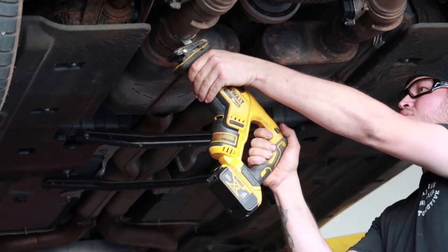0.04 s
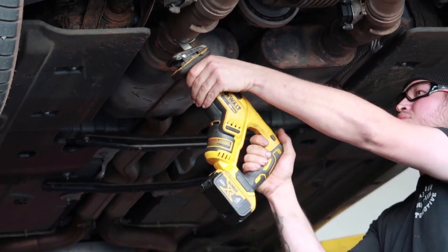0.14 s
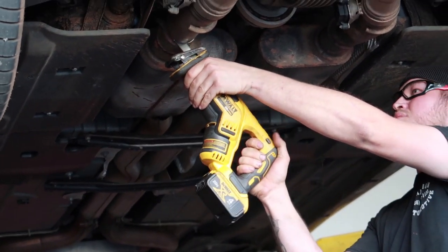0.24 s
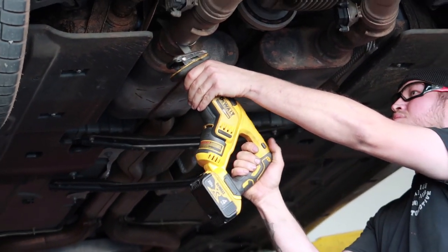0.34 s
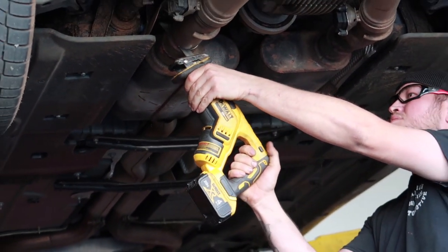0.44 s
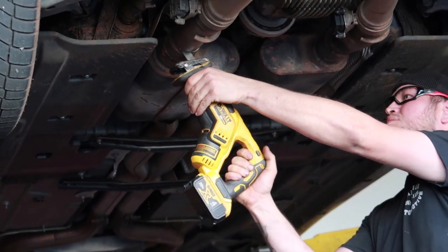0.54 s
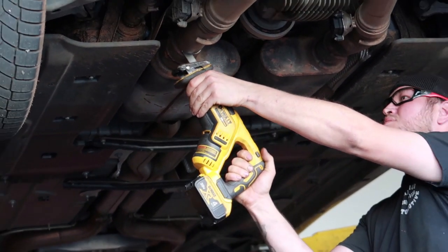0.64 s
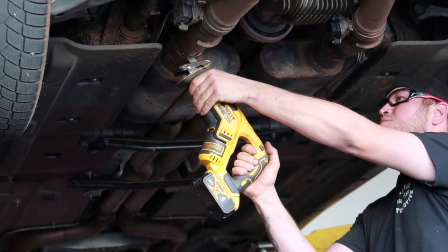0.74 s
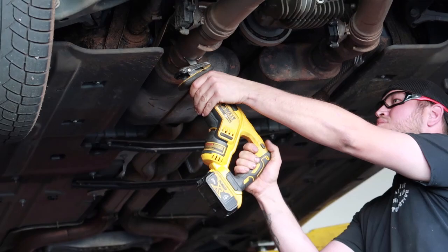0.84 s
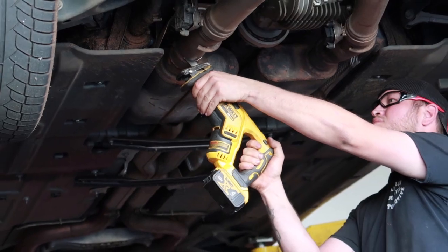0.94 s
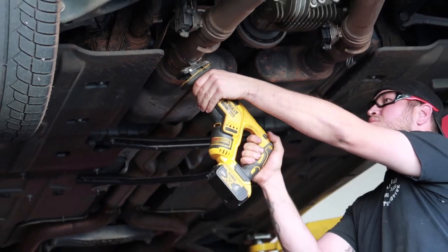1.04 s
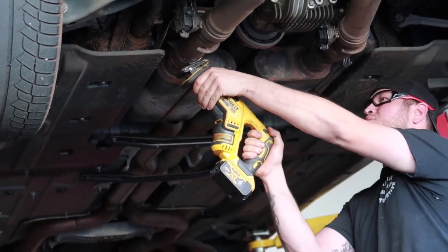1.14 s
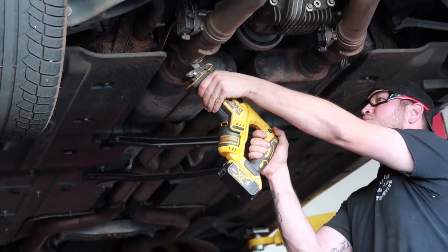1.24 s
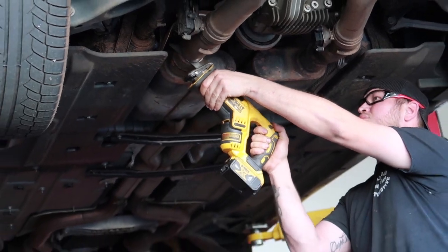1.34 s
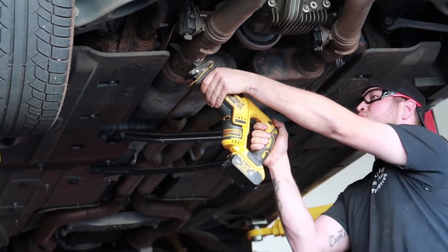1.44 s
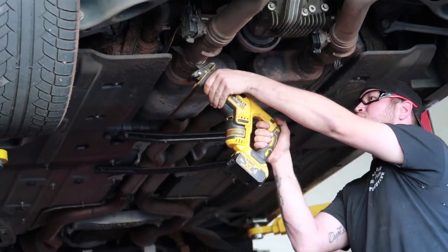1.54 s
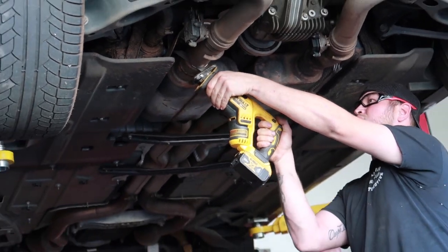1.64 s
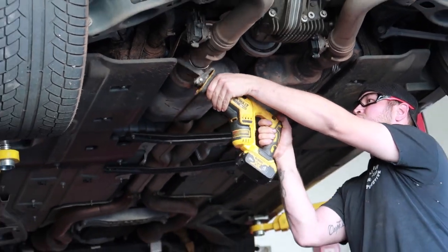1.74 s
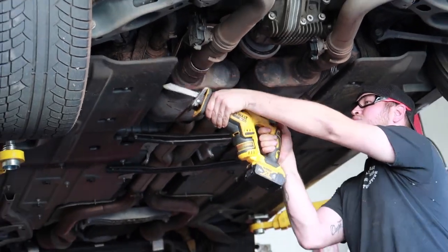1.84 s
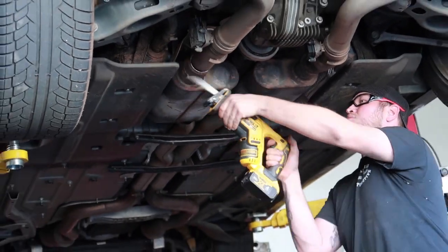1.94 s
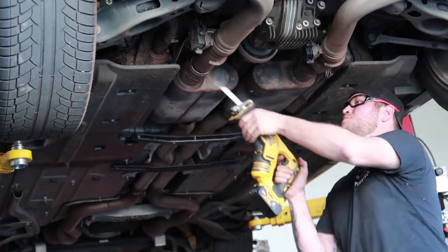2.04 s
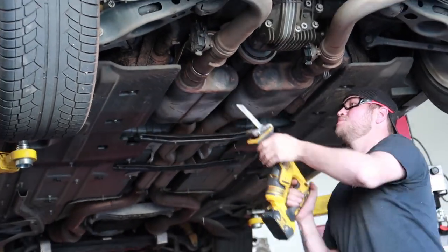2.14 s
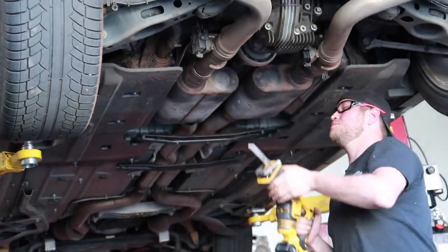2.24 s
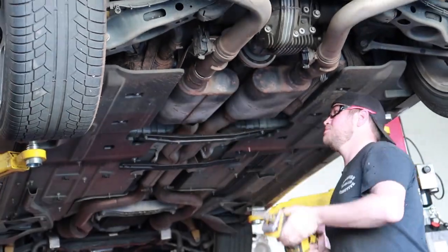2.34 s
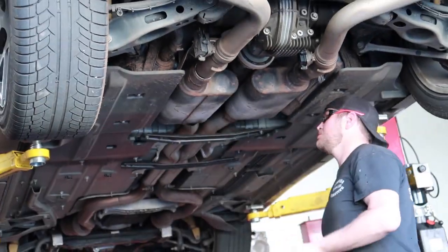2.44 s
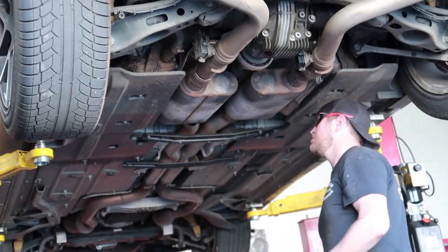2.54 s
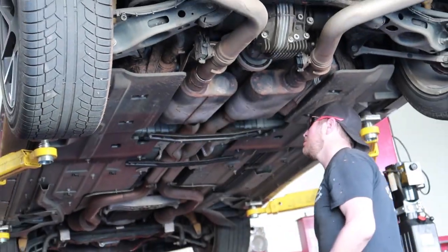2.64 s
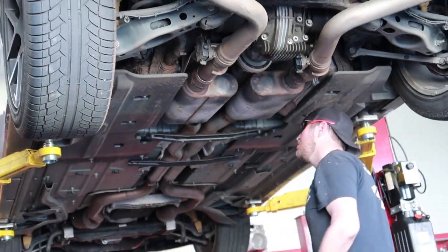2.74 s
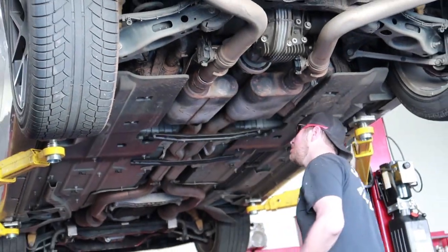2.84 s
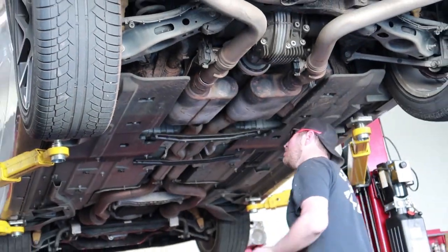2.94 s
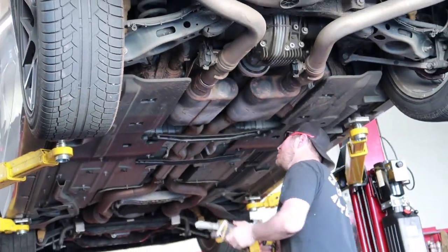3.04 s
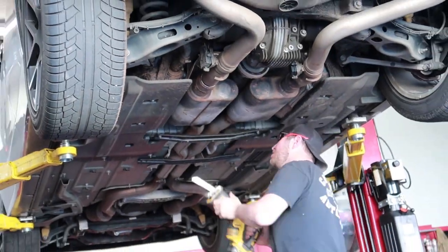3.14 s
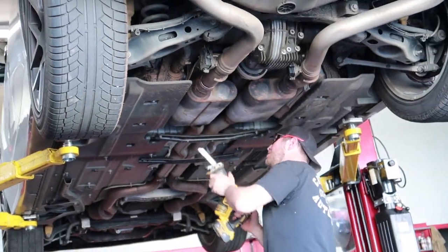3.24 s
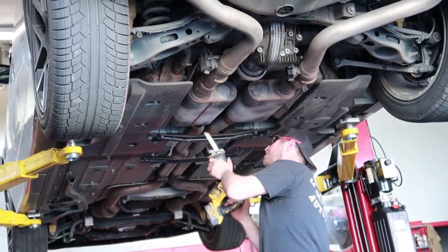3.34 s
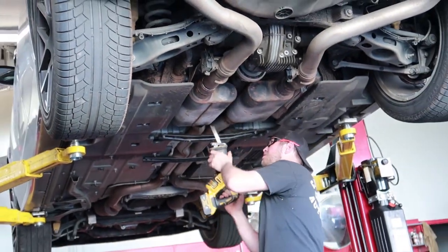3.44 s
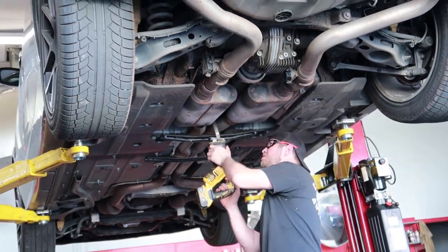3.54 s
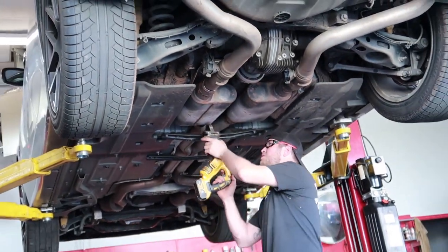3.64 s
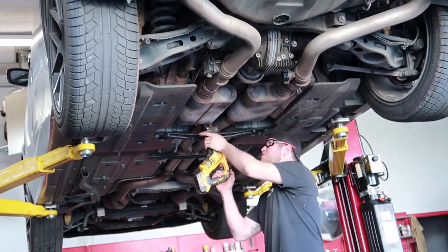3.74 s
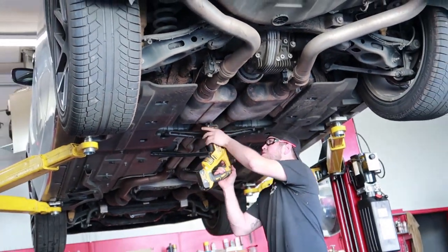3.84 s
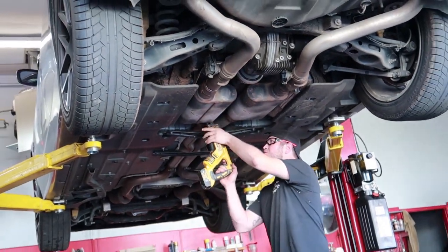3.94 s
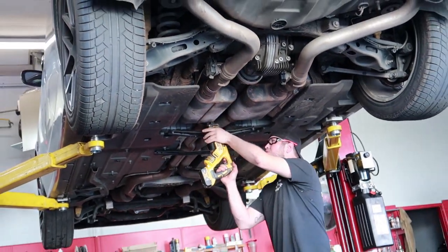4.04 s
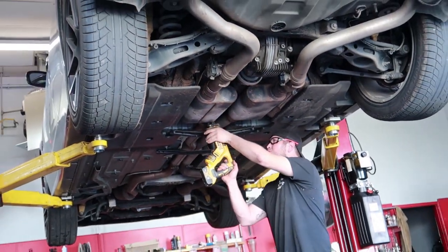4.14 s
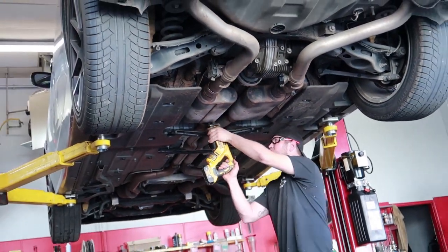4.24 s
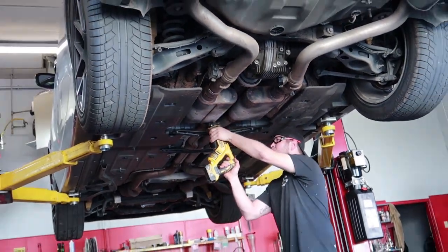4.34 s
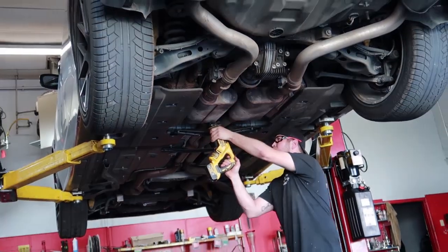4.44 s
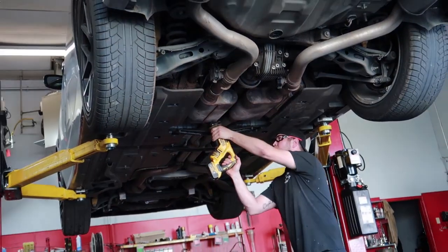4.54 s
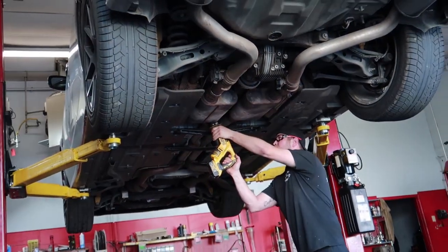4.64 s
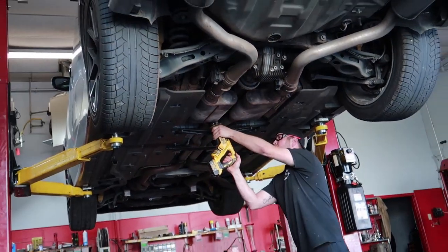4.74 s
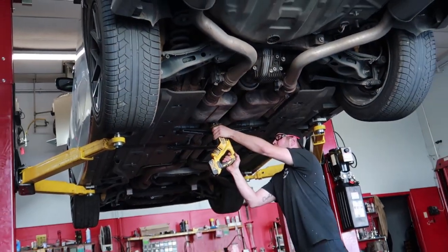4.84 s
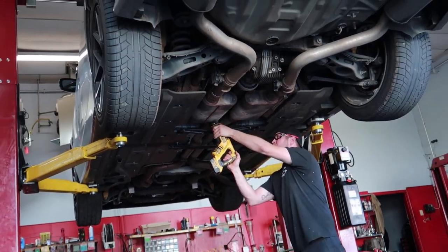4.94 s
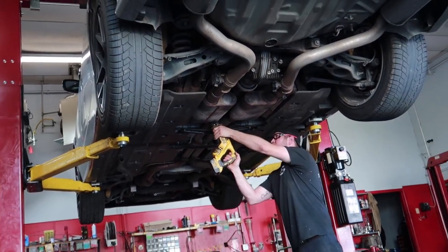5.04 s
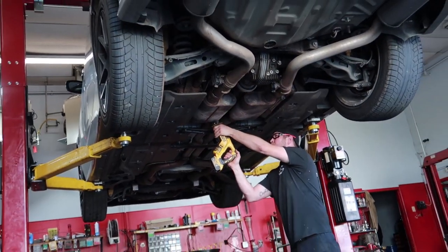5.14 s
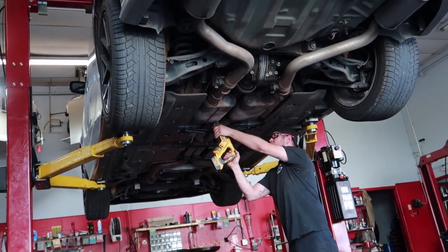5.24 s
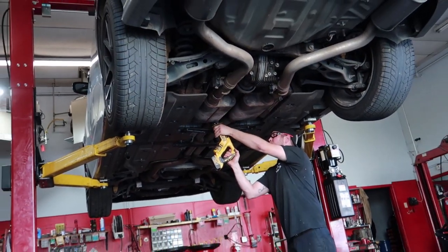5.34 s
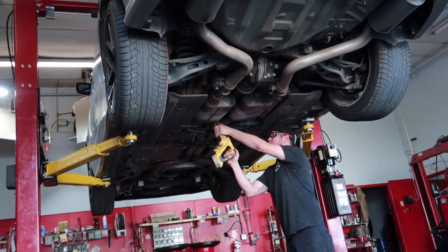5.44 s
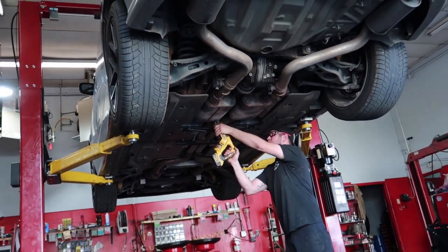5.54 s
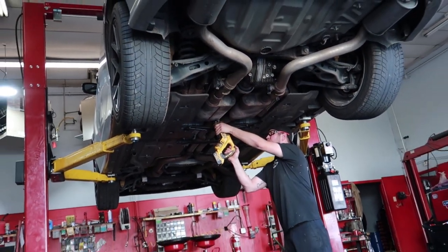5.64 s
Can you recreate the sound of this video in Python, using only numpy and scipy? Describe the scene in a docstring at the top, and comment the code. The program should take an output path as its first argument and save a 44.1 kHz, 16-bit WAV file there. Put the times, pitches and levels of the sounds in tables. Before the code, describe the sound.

A cordless reciprocating saw rasps and squeals through an exhaust pipe, which cracks free with a clunk; compressor drone, then short bursts on a second pipe.

```python
"""At first a reciprocating saw is already cutting an exhaust pipe in a repair shop, over a machine's drone:
tooth strikes excite pipe and blade, strokes pluck a beating squeal, and snags shriek as decaying tones.
Near 1.9 s the pipe parts: noise bursts crack and clunk, free modes ring on. In the pause automatic gain lifts
the drone, a piston machine's (probably an air compressor): clatter repeated each turn, tones and air noise.
The blade then touches a second pipe, is blipped twice, and cuts again."""
import sys
import numpy as np
from scipy import signal
from scipy.fft import rfft, irfft, next_fast_len
from scipy.io import wavfile
from scipy.ndimage import uniform_filter1d, map_coordinates

SR = 44100
rng = np.random.default_rng(int(sys.argv[2]) if len(sys.argv) > 2 else 0)


def to_wav(s):
    """Save 16-bit WAV."""
    ch = np.atleast_2d(s).T  # columns
    pcm = np.round(np.clip(ch, -1, 1) * 32767)  # PCM
    wavfile.write(sys.argv[1], SR, pcm.astype(np.int16))


N = 251800

# Levels are relative: each layer is given its own gain afterwards.
# Trigger pulls on each pipe: press t/s, release t/s, spin-up t/s, full stroke rate f/Hz,
# bite level/dB, time constant to seat the teeth t/s
FIRST_CUT = [(-.272, 2.12, .05, 38.83, -1, .02)]
SECOND_CUT = [(4.362, 4.505, 0.067, 37.5, -5.5, 0.0068), (4.68, 4.94, 0.095, 37.27, 4.5, 0.13),
              (5.212, 5.8, .04, 40.07, 2.5, 0.26)]
# Bite of the blade through each pipe, and the chatter resonance: t/s, level/dB, f/Hz
FIRST_KERF = [(0, 4, 2280), (.17, 3, 2260), (.3, -2, 2300), (.46, 0.5, 2640), (.55, -1, 1930),
              (.62, -3, 1600), (.7, -1, 2100), (.82, -0.5, 1850), (.89, -5, 2300), (.96, -4.5, 1470),
              (1.07, -2.5, 2340), (1.15, 0.5, 1900), (1.23, 1.5, 1700), (1.38, -1.5, 2040),
              (1.58, 0.5, 2130), (1.78, 0.5, 1500), (1.829, 2, 980), (1.89, -6, 800), (1.98, -10, 1290),
              (2.11, -8.5, 2040), (2.2, -14, 2150)]
SECOND_KERF = [(4.405, -0.5, 1310), (4.44, 1, 1900), (4.51, 2.5, 1850), (4.6, 1.5, 1870), (4.75, 1.5, 1490),
               (4.795, -3, 1170), (4.85, -1.5, 1790), (4.9, 1, 2280), (4.99, -5, 1880), (5.24, 1.5, 1681),
               (5.37, 1, 1950), (5.55, -1.5, 2070)]
# Rasp spectrum of each cut: f/Hz, level/dB per Hz
FIRST_RASP = [(180, -62), (300, -22.5), (571, -19.5), (696, -15), (848, -8.5), (1000, -12.5), (1070, -14),
              (1220, -5), (1420, -6.5), (2210, -5.5), (2750, -9), (3200, -14), (4490, -21), (5480, -25),
              (11900, -32.5), (15500, -43.5)]
SECOND_RASP = [(150, -29), (300, -11), (520, -6.5), (700, -3), (1020, -8), (1140, -4.5), (1650, 0),
               (2400, 4.5), (2900, -3), (4700, -11), (7500, -17), (9000, -24), (12000, -24.5), (15500, -50)]
# Resonances of each pipe: f/Hz, width f/Hz, level/dB
FIRST_PIPE = [(702, 22, -1), (991, 16, 3), (1142, 16, -3), (1260, 110, -10), (1735, 24, -2), (2032, 26, -1),
              (2200, 35, 2), (2575, 35, -3)]
SECOND_PIPE = [(338, 30, -5), (680, 24, -1), (890, 20, -4), (1138, 22, 0), (1340, 24, 2), (1560, 35, -3),
               (1772, 35, 0), (1900, 60, -2), (2230, 40, 0)]
# High modes of the blade: f/Hz, width f/Hz, level/dB
BLADE_MODES = [(5474, 35, 7), (5804, 33, 7), (6500, 340, -3.5)]
# Flares of the blade's high modes: t/s, half length t/s, level/dB
ZING_SWELLS = [(.16, 0.066, 9.5)]
# Pipe juddering with the blade: t/s, half length t/s, extra ring level/dB
JUDDERS = [(1.82, 0.17, 4)]
# Squeal swelling as the blade runs dry: t/s, half length t/s, level/dB
SQUEAL_SWELLS = [(.09, 0.077, 4.5), (.35, 0.1, 3), (.73, 0.039, 8.5), (1.5, 0.11, 8.5), (2.14, .05, 15),
                 (5.57, 0.11, 13.5)]
# Plunger hum: multiple of the stroke rate, level/dB
PLUNGER = [(1, -59), (3, -36), (5, -39), (9, -40)]
# Low hum swelling for a moment: t/s, half length t/s, level/dB
HUM_SWELLS = [(.85, 0.11, 5.5)]
# Compressor clatter and air spectrum: f/Hz, level/dB per Hz
PUMP = [(20, -20), (80, -2), (210, -7.5), (300, 0), (480, -14.5), (670, -8.5), (850, -16.5), (1240, -10.5),
        (1900, -20), (2850, -25.5), (4200, -38.5), (8000, -50), (11000, -51), (15000, -100)]
# Valve drone: multiple of the crank rate, level/dB
VALVES = [(15, -19.5), (20, -11.5), (21, -14.5), (23, -8.5), (25, -20), (27, -21), (28, -19.5)]
# Nearly steady machine tones: f/Hz, level/dB
HUM = [(118.4, -43), (306.8, -40), (382.2, -46), (689.1, -48), (1104, -50), (1265, -49), (1340, -50)]
# Swells of the low rumble: t/s, half length t/s, level/dB
RUMBLE_SWELLS = [(.75, 0.24, 14.5), (3.47, 0.23, 14), (4.0, 0.23, 6), (4.35, 0.13, 11), (4.76, 0.044, 15)]
# Snags of the blade in the kerf: t/s, level/dB, shriek f/Hz
SNAGS = [(0.089, -2, 2300), (0.348, 1, 2216), (0.372, 1, 2190), (0.451, -5.5, 2180), (0.661, -1.5, 2030),
         (1.095, 1.5, 2134), (1.139, 6, 1730), (1.191, 9.5, 1837), (1.246, 1, 1857), (1.349, 2, 2230),
         (1.399, 1, 2190), (1.505, 2.5, 2044), (1.558, 3, 2030), (1.584, 0.5, 2170), (1.608, 0, 2010),
         (4.852, -1.5, 1865), (4.904, -7, 2240), (4.937, 3, 1820), (5.515, -5, 2216), (5.62, -2.5, 1956),
         (5.691, 2, 2130)]
# Pipes dropping against their hangers: t/s, level/dB, 60 dB decay t/s
CLUNKS = [(1.893, -5, 0.16), (1.908, -7, 0.56), (4.765, -22, .25)]
# Clunk spectrum: f/Hz, level/dB per Hz
CLUNK_SPECTRUM = [(26, -30), (60, -1), (180, -6.5), (260, 8), (450, 0), (680, -10), (1500, -42),
                  (4000, -120)]
# Low modes of a hanging pipe: f/Hz, width f/Hz, level/dB
HANGING_PIPE = [(117, 40, -3), (255, 24, 1), (359, 37, 2), (485, 60, 1), (615, 28, 1.5)]
# Severed end ringing as it parts and as the blade strikes it: t/s, f/Hz, level/dB, 60 dB decay t/s
FREE_PIPE = [(1.893, 991, -20, 2.7), (1.893, 2832, -31, .9), (2.13, 823.6, -25, .6)]
# Short noise bursts, the crack as the pipe parts, then blade and shoe touching the second pipe:
# t/s, level/dB, 60 dB decay t/s
BURSTS = [(1.901, 0.5, 0.066), (3.774, -18, 0.14), (3.792, -22.5, 0.15), (3.868, -27.5, 0.12),
          (4.285, -34.5, 1), (4.417, -14, 0.16), (5.19, -24.5, 1)]
# Spectrum of these bursts: f/Hz, level/dB per Hz
BURST_SPECTRUM = [(600, -14), (1100, 11), (2100, 13), (3900, 0), (10000, -18.5), (15000, -31)]
# Reverberation: f/Hz, 60 dB decay t/s
SHOP_DECAY = [(200, 0.11), (2000, 0.55), (10000, 0.17)]
# Stereo width: f/Hz, side over mid level/dB
WIDTH = [(400, -24), (1000, -20), (2200, -15), (4400, -8), (8000, -2.5), (14000, 0)]

COAST_S = .27  # time constant of the motor running down after release
RING_DB_PER_S, SCRAPE_DB_PER_S, HISS_DB_PER_S = 68, 132, 166  # fading after release
UNSEATED_DB = 16  # weaker bite until the teeth have found the kerf
FREED_DB = -10  # the severed pipe is shaken less
SQUEAL_HZ, TWIN_HZ, SQUEAL_WANDER_HZ = 2205, 2272, 14
STROKE_DB = 2.5  # the scrape swells and sinks within each stroke
CEILING_DB, RECOVER_DB_PER_S, START_DUCK_DB = -9.4, 7.8, 16  # automatic gain control
TOP_HZ = 15350  # upper band limit


def amp(db):
    """Level to amplitude: 20 dB is a factor of ten."""
    return 10 ** (np.asarray(db) / 20)


def unit(x):
    """Normalisation of x to rms 1."""
    return x / np.sqrt(np.mean(x ** 2) + 1e-20)


def clock():
    """Time of each sample in s."""
    return np.arange(N) / SR


def along(points, hz):
    """Interpolation of (f/Hz, value) points on a logarithmic frequency axis."""
    f, v = np.transpose(points)
    return np.interp(np.log(hz + 1), np.log(f + 1), v)


def curves(rows):
    """Linear interpolation in time: one curve for each column after t/s."""
    s, *cols = np.transpose(rows)
    return [np.interp(clock(), s, c) for c in cols]


def wobble(rate):
    """Smooth random modulation: a spline through rate normal draws a second."""
    knots = rng.standard_normal(int(N * rate / SR) + 4)
    return map_coordinates(knots, [clock() * rate])


def swells(rows):
    """Superposition of Gaussian swells: t/s, half length t/s, height."""
    return sum(height * np.exp(-((clock() - s) / half) ** 2) for s, half, height in rows)


def fade(s, t60, attack):
    """Exponential decay of a blow at time s, after a short rounded attack."""
    age = np.maximum(clock() - s, 0)
    return amp(-60 * age / t60) * (1 - np.exp(-age / attack))


def filtered(x, response):
    """Linear filtering: the spectrum of x times a response of frequency."""
    size = next_fast_len(N + SR // 2)
    hz = np.fft.rfftfreq(size, 1 / SR)
    return irfft(rfft(x, size) * response(hz), size)[:N]


def coloured(x, spectrum):
    """Spectral shaping of x by (f/Hz, level/dB) points, at rms 1."""
    return unit(filtered(x, lambda hz: amp(along(spectrum, hz))))


def noise(spectrum):
    """Random excitation: fresh white noise given a spectrum."""
    return coloured(rng.standard_normal(N), spectrum)


def band(x, lo_hz, hi_hz, order=10):
    """Band-pass filtering with smooth skirts, at rms 1."""
    def response(hz):
        low_cut = 1 + (lo_hz / (hz + 1)) ** order
        high_cut = 1 + (hz / hi_hz) ** order
        return 1 / (low_cut * high_cut)
    return unit(filtered(x, response))


def resonate(x, modes):
    """Modal superposition: damped resonances with alternating sign along the list, at rms 1."""
    def response(f):
        total = 0
        for k, (centre, width, db) in enumerate(modes):
            damping = 1j * f * width
            total = total + (-1) ** k * amp(db) * damping / (centre * centre - f * f + damping)
        return total
    return unit(filtered(x, response))


def ringing(x, t60):
    """Dense modal response: convolution with exponentially decaying noise."""
    t = np.arange(SR // 5) / SR
    tail = rng.standard_normal(len(t)) * amp(-60 * t / t60)
    return signal.fftconvolve(x, tail / np.linalg.norm(tail))[:N]


def spun_up(press, spin_up):
    """Linear motor acceleration: share of full speed after the trigger is pressed."""
    return np.clip((clock() - press) / spin_up, 0, 1)


def strokes(pulls):
    """Speed integrated to a stroke count: the motor spins up linearly and coasts down exponentially."""
    speeds = []
    for press, release, spin_up, rate, bite, seat in pulls:
        coasting = np.exp(-np.maximum(clock() - release, 0) / COAST_S)
        speeds.append(rate * spun_up(press, spin_up) * coasting)
    return np.cumsum(np.max(speeds, axis=0)) / SR


def effort(pulls, fade_db_per_s, follows):
    """Drive of a layer: amplitude rises as speed squared, follows the seating bite, decays after release."""
    t, gain = clock(), 0
    for press, release, spin_up, rate, bite, seat in pulls:
        seated_db = bite - UNSEATED_DB * np.exp(-np.maximum(t - press, 0) / seat)
        faded_db = fade_db_per_s * np.maximum(t - release, 0)
        gain = gain + spun_up(press, spin_up) ** 2 * amp(follows * seated_db - faded_db)
    return gain


def teeth(turn, pull_db, rate=2400, scatter_db=3.5, dust=0.97):
    """Random impulses: teeth strike more densely the faster the blade slides, over the rub of the chips."""
    slide = np.abs(np.cos(2 * np.pi * turn))
    struck = rng.random(N) < rate * (1 + slide) / 2 / SR  # rate per s is reached at full slide
    strikes = struck * amp(scatter_db * rng.standard_normal(N)) * rng.choice([-1, 1], N)
    stroke_gain = amp(pull_db * np.cos(2 * np.pi * turn) + 0.96 * wobble(25))
    return (unit(strikes) + dust * rng.standard_normal(N)) * stroke_gain


def shifting(x, share, turns=0.8904):
    """Time-varying modal response: the growing kerf keeps retuning the pipe's many weak modes."""
    angle = 2 * np.pi * turns * clock()  # crossfades two dense responses, turns per s
    near, far = ringing(x, t60=.16), ringing(x, t60=.16)
    return unit(x + share * (near * np.cos(angle) + far * np.sin(angle)))


def chatter(x, centre_hz, boost_db, octaves=0.3):
    """Moving resonance: a broad spectral peak travels along centre_hz."""
    hz, t, z = signal.stft(x, SR, nperseg=512)
    distance = np.log2((hz[:, None] + 1) / np.interp(t, clock(), centre_hz)) / octaves
    peak = amp(boost_db * np.exp(-distance ** 2))
    return signal.istft(z * peak, SR, nperseg=512)[1][:N]


def squeal(turn, scatter_db=2.5, t60=0.05, attack=0.006, twin_db=-7):
    """Beating of two close bending tones, plucked once a stroke with unequal force, at rms 1."""
    plucks = np.diff(np.floor(turn + .04 * wobble(40)), prepend=0) > 0
    sizes = amp(scatter_db * np.clip(rng.standard_normal(N), -2, 1))
    envelope = signal.fftconvolve(plucks * sizes, fade(0, t60, attack))[:N]

    def tone(hz):
        cycles = np.cumsum(hz + SQUEAL_WANDER_HZ * wobble(9)) / SR
        return np.sin(2 * np.pi * cycles + 0.16 * wobble(400))
    return unit(envelope * (tone(SQUEAL_HZ) + amp(twin_db) * tone(TWIN_HZ)))


def sticking(depth_db=-4.5, half_s=.004):
    """Stick-slip: the blade sticks and the rasp dips just before each snag tears loose."""
    return amp(swells([(s - half_s / 2, half_s, depth_db) for s, db, hz in SNAGS]))


def cut(pulls, kerf, rasp, pipe, shaken, modes_db, chatter_db, pull_db, ring_db, scrape_db, squeal_db,
        hiss_db, zing_db, squeal_follows=1.9, hiss_follows=0.95):
    """Forced vibration: teeth shake pipe and blade; a deeper bite gives more scrape, squeal and hiss."""
    turn = strokes(pulls)
    bite, chatter_hz = curves(kerf)
    steel = coloured(teeth(turn, pull_db), rasp) + amp(modes_db) * resonate(teeth(turn, pull_db), pipe)
    steel = shifting(steel, share=0.65)
    zing = amp(zing_db + swells(ZING_SWELLS)) * resonate(teeth(turn, pull_db), BLADE_MODES)
    edge = band(steel, 3160, 20000) + zing
    grip = 1.0 * wobble(30)  # dB: no two strokes bite alike

    ring_gain = amp(ring_db + shaken + swells(JUDDERS)) * effort(pulls, RING_DB_PER_S, 0)
    ring = ring_gain * band(steel, 200, 1310)
    stroke_db = STROKE_DB * np.sin(2 * np.pi * turn)
    scrape_gain = amp(scrape_db + bite + grip + stroke_db) * effort(pulls, SCRAPE_DB_PER_S, 1.0)
    scrape = scrape_gain * band(steel, 1250, 3940)
    squeal_gain = amp(squeal_db + squeal_follows * bite + swells(SQUEAL_SWELLS))
    squeal_gain = squeal_gain * effort(pulls, squeal_follows * SCRAPE_DB_PER_S, squeal_follows)
    hiss_gain = amp(hiss_db + hiss_follows * bite + grip) * effort(pulls, HISS_DB_PER_S, hiss_follows)

    sound = chatter(ring + scrape, chatter_hz, chatter_db) + squeal_gain * squeal(turn) + hiss_gain * edge
    return sound * sticking()


def shake(pulls, level_db, gears_db):
    """Harmonics of the stroke rate: odd ones from the plunger, a high group from the whirring gears."""
    turn = strokes(pulls) + 0.016 * wobble(6)
    hum = 0
    for k, db in PLUNGER:
        phase = 2 * np.pi * round(k) * turn + .5 * wobble(18)
        hum = hum + amp(db + 3.5 * wobble(9.27)) * np.sin(phase)
    mesh = np.arange(17, 34)  # multiples of the stroke rate
    gears = unit(sum(rng.rayleigh() * np.sin(2 * np.pi * (k * turn + rng.random())) for k in mesh))
    drive = amp(level_db + swells(HUM_SWELLS)) * hum + amp(gears_db) * gears
    return effort(pulls, RING_DB_PER_S, 0) * drive


def compressor(level_db=-25, crank_hz=12.78, clatter_db=-7, air_db=-8.0, valves_db=1, hum_db=28):
    """Periodicity: the same clatter returns each crank turn, with valve harmonics, hum and rushing air."""
    turn = crank_hz * clock() + .003 * wobble(3)
    one_turn = rng.standard_normal(round(SR / crank_hz))
    place = (turn % 1 * len(one_turn)).astype(int) % len(one_turn)
    clatter = coloured(one_turn[place], PUMP)
    valves = 0
    for k, db in VALVES:
        phase = 2 * np.pi * (round(k) * turn + rng.random())
        valves = valves + amp(db + 1.4 * wobble(10)) * np.sin(phase)
    hum = 0
    for hz, db in HUM:
        phase = 2 * np.pi * hz * clock() + 0.44 * wobble(6.5)
        hum = hum + amp(db + 1.3 * wobble(5.8)) * np.sin(phase)
    machine = amp(clatter_db) * clatter + amp(air_db) * noise(PUMP)
    machine += amp(valves_db) * valves + amp(hum_db) * hum
    return amp(level_db) * machine


def rumble(level_db=-45):
    """Amplitude-modulated low-frequency noise: a lumpy rumble that swells at times."""
    # f/Hz, level/dB per Hz
    colour = [(15, -11), (30, -5.0), (70, 6.5), (130, -3.0), (220, -10), (450, -47), (3000, -120)]
    return amp(level_db + swells(RUMBLE_SWELLS) + 2.4 * wobble(9.9)) * noise(colour)


def snags(snag_db=13, t60=0.047, attack=0.007, tear_db=-10):
    """Transient excitation: a caught tooth tears at the edge and the blade shrieks for an instant."""
    waver, t = 1.04 * wobble(500), clock()
    tear = amp(tear_db) * noise(FIRST_RASP)
    total = 0
    for s, db, hz in SNAGS:
        shriek = np.sin(2 * np.pi * hz * t + waver)
        total = total + amp(db + snag_db) * fade(s, t60, attack) * (shriek + tear)
    return total


def knocks(rows, body, attack):
    """Impact on a body of many close modes: decaying envelopes on a noise-like signal."""
    return body * sum(amp(db) * fade(s, t60, attack) for s, db, t60 in rows)


def severed_pipe(modes_db=-1):
    """Impact and free vibration: pipes drop with a clunk and the cut end rings in decaying sine modes."""
    ring = 0
    for s, hz, db, t60 in FREE_PIPE:
        phase = 2 * np.pi * hz * clock() + 0.17 * wobble(16)
        ring = ring + amp(db) * fade(s, t60, 0.012) * np.sin(phase)
    body = unit(noise(CLUNK_SPECTRUM) + amp(modes_db) * resonate(rng.standard_normal(N), HANGING_PIPE))
    return ring + knocks(CLUNKS, body, attack=0.0036)


def crack_and_touches():
    """Short noise bursts: the crack as the pipe parts, then blade and shoe touching the second pipe."""
    return knocks(BURSTS, noise(BURST_SPECTRUM), attack=0.0033)


def shop(x, wet_db):
    """Reverberation: the car's underside and the hall answer, with decay time set by frequency."""
    hz, t, z = signal.stft(rng.standard_normal(SR // 2), SR, nperseg=256)
    decay = amp(-60 * t / along(SHOP_DECAY, hz)[:, None])
    tail = signal.istft(z * decay, SR, nperseg=256)[1]
    wet = signal.fftconvolve(x, tail / np.linalg.norm(tail))[:N]
    return (x + amp(wet_db) * wet) / np.hypot(1, amp(wet_db))


def spread(mid):
    """Decorrelation: two channels nearly share the bass; shifting reflections set their treble apart."""
    scattered = ringing(mid, t60=.04) * wobble(90) + ringing(mid, t60=.04) * wobble(90)
    side = filtered(scattered / np.sqrt(2), lambda hz: amp(along(WIDTH, hz)))
    return np.array([mid + side, mid - side]) * amp([[-.2], [.2]])


def gain_control(x):
    """Automatic gain: it drops fast where the level demands more ducking, then recovers at a steady dB/s."""
    power = np.abs(uniform_filter1d(np.mean(x ** 2, axis=0), size=SR // 250))
    excess_db = np.maximum(10 * np.log10(power + 1e-12) - CEILING_DB, 0)
    recovered = RECOVER_DB_PER_S * clock()
    # a running maximum on a rising slope holds each duck, which then shrinks at the recovery rate
    held_db = np.maximum(np.maximum.accumulate(excess_db + recovered), START_DUCK_DB)
    return x * amp(-uniform_filter1d(held_db - recovered, size=SR // 500))


def scene():
    """Superposition: cuts, snags and bursts reverberate; drive, clunks, drone and rumble are added."""
    freed = FREED_DB * np.clip((clock() - CLUNKS[0][0]) / 0.14, 0, 1)
    first = cut(FIRST_CUT, FIRST_KERF, FIRST_RASP, FIRST_PIPE, shaken=freed, modes_db=-3.5,
                chatter_db=5.0, pull_db=-0.3, ring_db=-14.0, scrape_db=-9.5, squeal_db=-18,
                hiss_db=-17.0, zing_db=-6.0)
    second = cut(SECOND_CUT, SECOND_KERF, SECOND_RASP, SECOND_PIPE, shaken=0, modes_db=-4.5,
                 chatter_db=6.5, pull_db=0.5, ring_db=-19, scrape_db=-11.0, squeal_db=-24,
                 hiss_db=-21.5, zing_db=-18)
    saw = shop(first + second + snags(), wet_db=-9.0) + shop(crack_and_touches(), wet_db=0.0)
    drive = shake(FIRST_CUT, level_db=4.0, gears_db=-28) + shake(SECOND_CUT, level_db=-3.5, gears_db=-31)
    return spread(saw + drive + compressor() + rumble() + severed_pipe())


def record(dry):
    """Gain control, soft saturation of the highest peaks, and an upper band limit, in that order."""
    held = gain_control(dry)
    rounded = held / (1 + (held / .85) ** 6) ** (1 / 6)
    return np.array([filtered(channel, lambda hz: hz < TOP_HZ) for channel in rounded])


dry = scene()
out = record(dry)
to_wav(out)
```